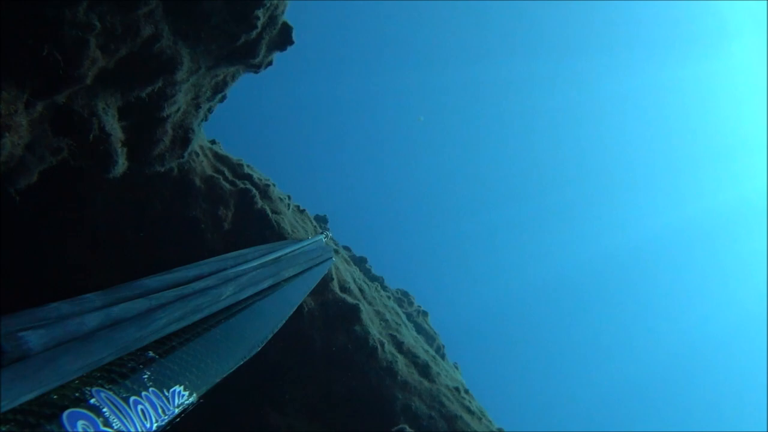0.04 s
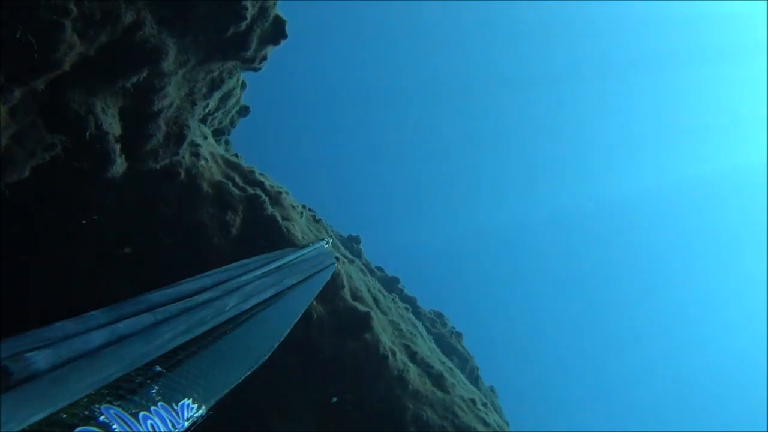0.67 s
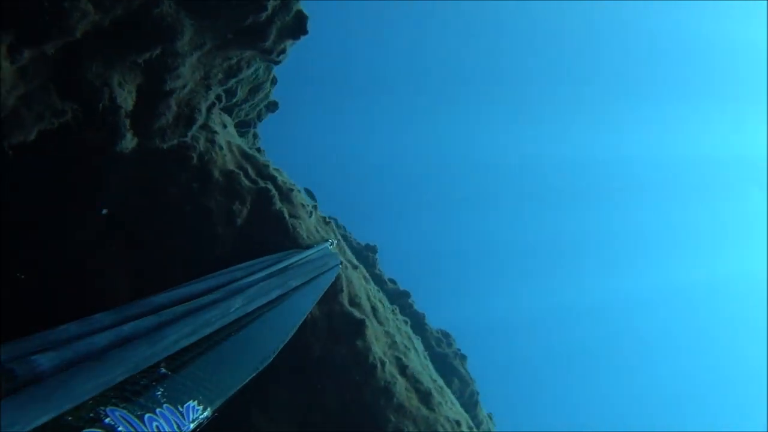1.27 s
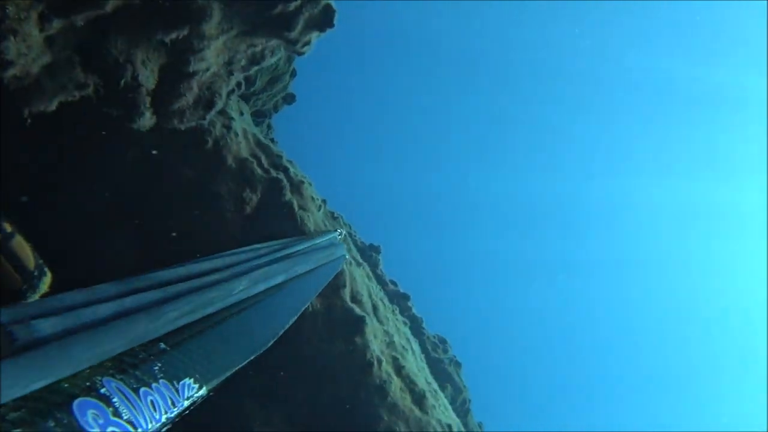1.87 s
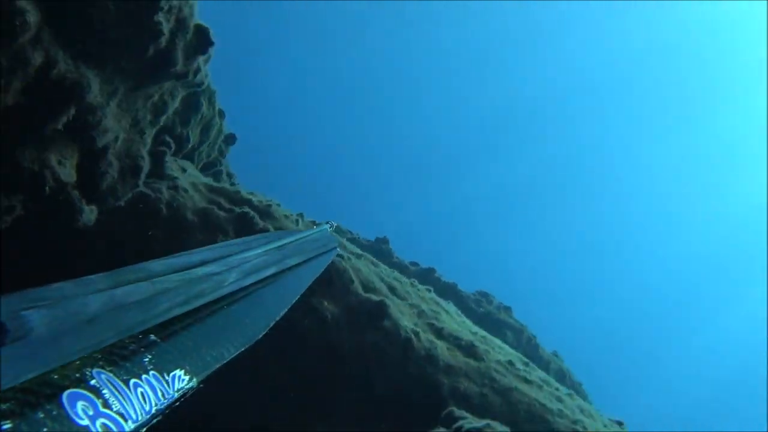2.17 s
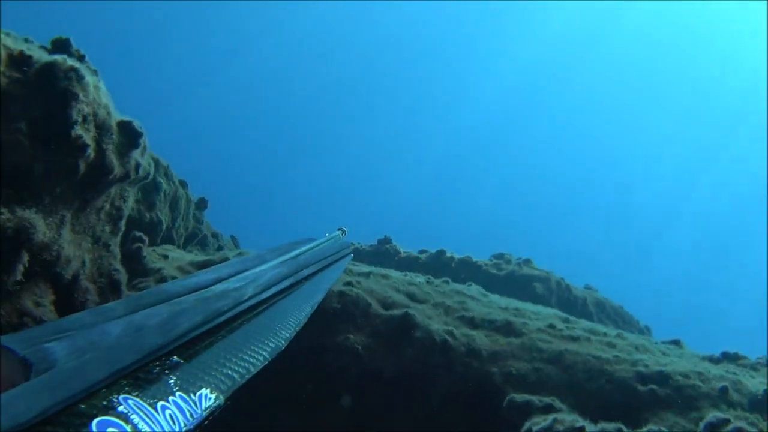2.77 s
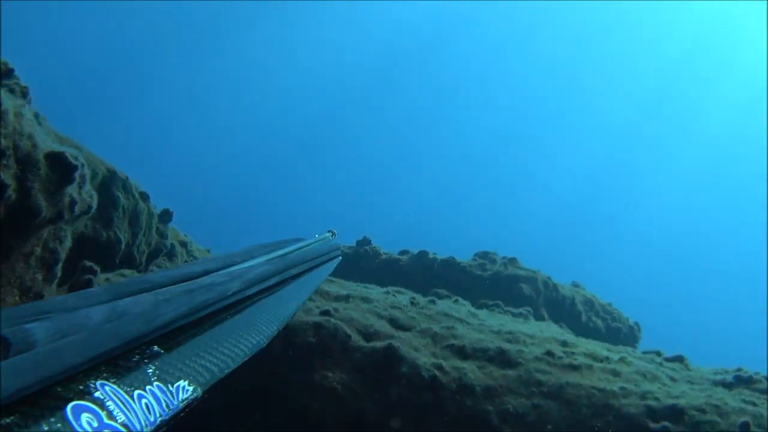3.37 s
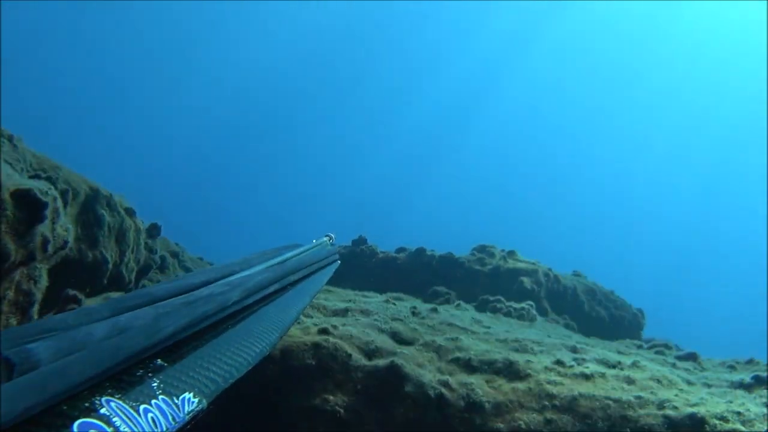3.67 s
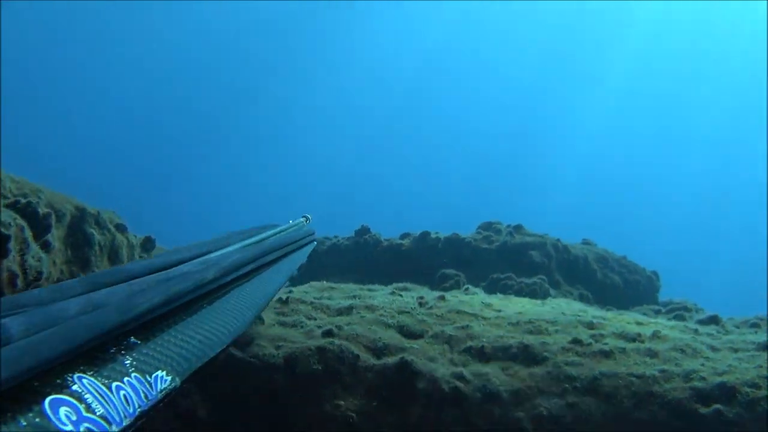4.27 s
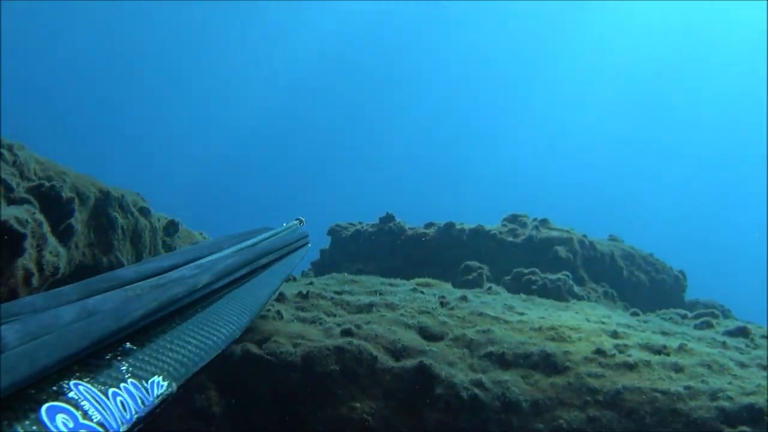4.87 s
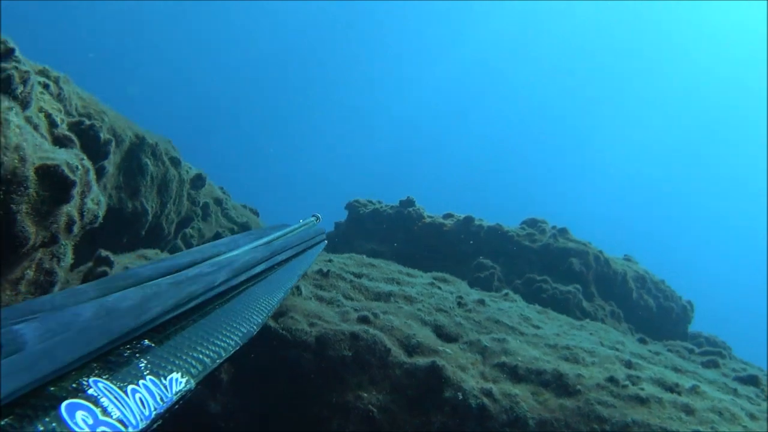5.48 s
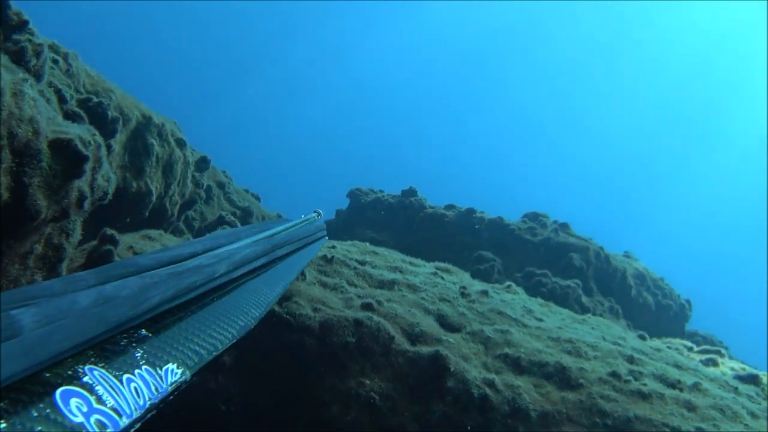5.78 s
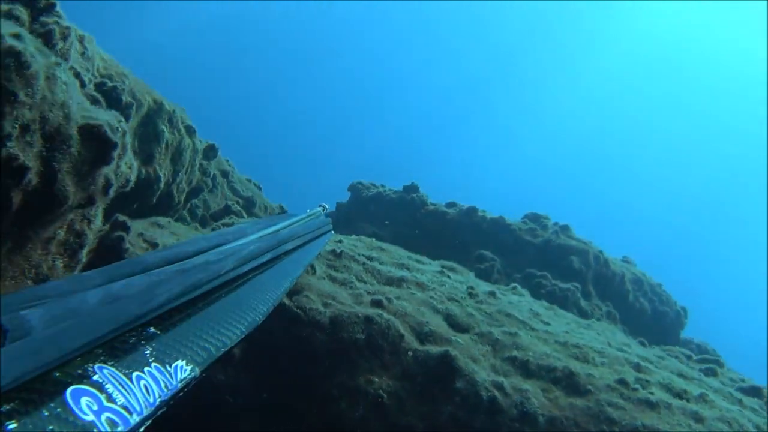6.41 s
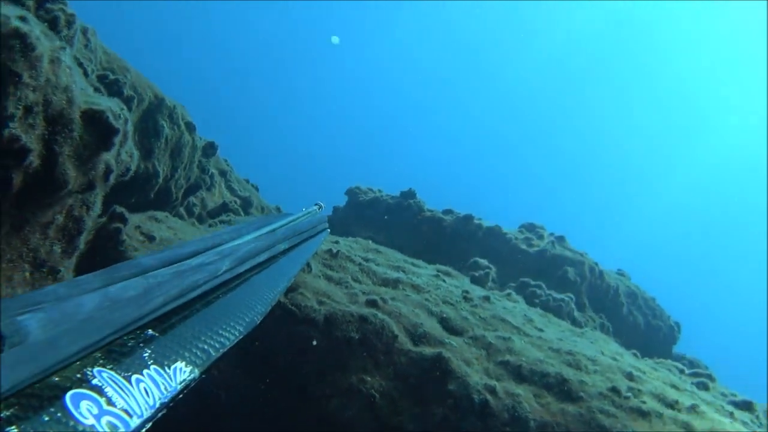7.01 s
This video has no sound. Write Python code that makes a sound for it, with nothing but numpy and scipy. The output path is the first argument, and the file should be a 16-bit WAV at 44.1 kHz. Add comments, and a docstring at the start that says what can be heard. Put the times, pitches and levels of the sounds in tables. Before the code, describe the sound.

A microphone mounted on a speargun picks up close handling noise under water: light taps, dull scuffs and low bumps. Just past the middle come two loud, hollow clacks in quick succession, each with a short ring and a low hum from the shaft. Deep thuds and muffled knocks continue afterwards. Throughout, the reef gives a faint hiss and the scattered sharp clicks of snapping shrimp.

```python
"""Under water on a rocky reef, heard by a camera fixed to a diver's speargun.
From the start, snapping shrimp click all around over a faint hiss coloured by the camera's housing.
For four seconds the gun is lightly tapped, rubbed and bumped, and sways on its mount with low thuds.
At 4.15 and 4.53 s it clacks loudly against something hard, ringing the housing and the long shaft.
More thuds, rubs and softer knocks follow to the end."""
import sys
import numpy as np
from scipy import signal
from scipy.fft import rfft, irfft
from scipy.io import wavfile

SR = 44100
rng = np.random.default_rng(int(sys.argv[2]) if len(sys.argv) > 2 else 0)


def generate_wav(signal):
    """Clip the signal to [-1, 1] and save it as 16-bit WAV at the path in sys.argv[1]."""
    frames = np.transpose(np.atleast_2d(signal))
    scaled = np.clip(frames, -1, 1) * 32767
    pcm = np.round(scaled).astype(np.int16)
    wavfile.write(sys.argv[1], SR, pcm)


N = 319725

# Shoves of the gun. Each row: start in seconds, sway in dB, shaft hum in dB, change per rebound in dB.
SHOVES = [(0.287, -37, -70, -2.5), (1.639, -36.5, -53, -19.5), (1.864, -27, -70, -4.5),
          (2.203, -26.5, -57, -0.5), (3.293, -39.5, -66, -15), (4.148, -18, -38.5, -8),
          (4.529, -15, -32, -7), (5.056, -36.5, -50.5, -1), (5.755, -15, -55, -5), (6.084, -17, -40.5, -8),
          (6.931, -32.5, -70, -10), (7.193, -16.5, -42.5, -12)]
HISS_TOP_HZ, SNAP_TOP_HZ, BAND_TOP_HZ = 11200, 11500, 16500


def amp(db):
    """Decibels to gain."""
    return 10 ** (np.asarray(db) / 20)


def unit_rms(x):
    """Scales to rms 1."""
    return x / np.sqrt(np.mean(x ** 2) + 1e-20)


def curve_at(points, hz):
    """Interpolates a table on a log-frequency axis."""
    points_hz, values = np.transpose(points)
    return np.interp(np.log(hz + 1), np.log(points_hz + 1), values)


def add(mix, start_s, sound, pan_db=0):
    """Mixes a sound in; pan_db is left over right."""
    part = mix[:, max(round(start_s * SR), 0):][:, :sound.shape[-1]]
    part += (sound * amp([[pan_db / 2], [-pan_db / 2]]))[:, :part.shape[1]]


def lowpass(x, hz, order=2):
    """Causal low-pass."""
    return signal.sosfilt(signal.butter(order, min(hz, SR / 2 - 100), fs=SR, output="sos"), x)


def port_sine(hz, t, lead_rad):
    """A sine at the two microphone ports, the left leading."""
    return np.sin(2 * np.pi * hz * t + np.array([[.5], [-.5]]) * lead_rad)


def port_noise(colour, size, top_hz=BAND_TOP_HZ):
    """Noise partly shared by the two ports. Each colour row: frequency in Hz, relative level in dB."""
    # Each row: frequency in Hz, correlation of the ports (negative: they move against each other).
    port_correlation = [(50, 0.93), (150, 0.23), (300, -0.45), (800, -0.77), (1300, -0.59), (2000, -0.52),
                        (4000, -0.25), (6500, 0.14), (10000, 0.29)]
    hz = np.fft.rfftfreq(size, 1 / SR)
    left, independent = rfft(rng.standard_normal((2, size)))
    shared = np.clip(curve_at(port_correlation, hz), -1, 1)
    right = shared * left + np.sqrt(1 - shared ** 2) * independent
    spectra = np.array([left, right]) * amp(curve_at(colour, hz)) * (hz < top_hz)
    return unit_rms(irfft(spectra, size))


def water(hiss_db=-53.0, rumble_db=-2):
    """Steady hiss, and the rumble of water moving round the gun."""
    # Each row: frequency in Hz, relative density in dB.
    hiss_colour = [(20, 14.5), (52, 8), (100, -6), (250, -4), (600, -5.5), (950, -6), (1290, 1),
                   (1700, -7.5), (2500, -13), (4500, -21.5), (6500, -21.5), (9000, -26), (11000, -27)]
    # Each row: time in seconds, level in dB before rumble_db.
    rumble_levels = [(0.0, -77), (0.4, -61.5), (1.79, -56.5), (2.17, -41.5), (3.05, -59.5), (3.44, -47),
                     (3.9, -54), (4.76, -47), (5.02, -57), (5.95, -40.5), (7.15, -53.5)]
    level_db = np.interp(np.arange(N) / SR, *np.transpose(rumble_levels))
    rumble_colour = [(10, -6.5), (22, 1.5), (31, 0.5), (44, -8), (60, -4), (80, -20), (110, -37),
                     (800, -86)]
    rumble = amp(level_db + rumble_db) * port_noise(rumble_colour, N)
    return amp(hiss_db) * port_noise(hiss_colour, N, HISS_TOP_HZ) + rumble


def snap(pop_db, tick_t60_s=0.0099, pop_t60_s=0.021, size=768):
    """A shrimp's bubble collapses: a bright tick, and a lower pop that the housing holds longer."""
    # Each row of both: frequency in Hz, relative level in dB.
    tick_colour = [(2000, -51), (4200, -7), (5300, -6), (6400, -0.5), (7600, 1), (8700, -22.5), (10800, -7),
                   (12000, -111)]
    pop_colour = [(600, -20), (1500, -32), (2200, -18), (3170, 6), (4000, -15), (5000, -12), (8000, -40)]
    t = np.arange(size) / SR
    tick = port_noise(tick_colour, size) * amp(-60 * t / tick_t60_s)
    pop = port_noise(pop_colour, size) * amp(pop_db - 60 * t / pop_t60_s)
    click = lowpass(tick + pop, SNAP_TOP_HZ, order=10)
    return click / np.linalg.norm(click)


def shrimp(near_db=16, near_pop_db=9, pan_db=-2, far_db=-49, far_per_s=50, spread_db=6.0,
           ceiling_db=15, animals=24):
    """A few near snaps stand out of the crackle of the whole reef."""
    # Each row: start in seconds, level in dB before near_db, pop over tick in dB before near_pop_db.
    near_snaps = [(0.3292, -42, -27), (0.355, -43.5, -16), (0.952, -46, -15), (1.4446, -47, -24),
                  (1.6212, -41, -32), (1.9016, -46, -26), (2.155, -41, -23), (2.5263, -46.5, -27),
                  (2.6957, -43, -7), (2.8477, -43, -17), (3.037, -42, -16.5), (3.8139, -43.5, -28),
                  (4.0677, -42.5, -9), (4.6423, -43, -16), (5.1672, -45.5, -15), (6.129, -42, -8.5),
                  (6.2256, -46, -26), (7.1048, -48.5, -19)]
    out = np.zeros((2, N))
    for start_s, db, pop_db in near_snaps:
        add(out, start_s, amp(db + near_db) * snap(pop_db + near_pop_db), pan_db)
    excess_db = np.minimum(spread_db * rng.exponential(1, N), ceiling_db)
    impulses = amp(far_db + excess_db) * (rng.random(N) < far_per_s / SR)
    animal = rng.integers(0, animals, N)
    for k, pop_db in enumerate(np.linspace(-26, 2, animals)):
        out += signal.oaconvolve((impulses * (animal == k))[None], snap(pop_db), axes=1)[:, :N]
    return out


def shaft_hum(build_s=0.0092):
    """The long shaft's bending after one shove."""
    # Each row: frequency in Hz, level in dB, t60 in seconds, left port's lead in radians.
    bending_modes = [(81.2, -1.5, 0.23, 0.26), (148, 2, 0.051, 0.78), (191, -5.5, 0.14, 5.4),
                     (245.4, 0.5, 0.34, 0.94), (327, -25, 0.086, 1.6), (484, 0, 0.075, 0.33)]
    t = np.arange(SR * 3 // 4) / SR
    hum = sum(amp(db - 60 * t / t60_s) * port_sine(hz, t, lead_rad)
              for hz, db, t60_s, lead_rad in bending_modes)
    return hum * (1 - np.exp(-t / build_s))


def housing_ring(build_cycles=1.07):
    """Gun and housing after one blow: each mode swells within a cycle or two, then dies."""
    # Each row: frequency in Hz, level in dB, t60 in seconds, left port's lead in radians.
    housing_modes = [(506, -38, 0.11, 2.5), (619, -30, 0.12, 3.5), (707, -24, 0.048, 3.5),
                     (798, -17.5, 0.014, 4), (968, -16, 0.032, 1.8), (1100, -6.5, 0.027, 1.07),
                     (1218, -9, 0.013, -0.1), (1411, -15, 0.021, -1.66), (1732, -18.5, 0.043, -3),
                     (1955, -21, 0.034, 1.9), (2440, -19.5, 0.015, 1.44), (2585, -18.5, 0.018, -2),
                     (2870, -16.5, 0.016, -2.5), (3276, -11.5, 0.0096, 2), (4410, -22.5, 0.02, 2.2),
                     (4880, -22, 0.0069, 0.3), (5820, -17, 0.01, 2.4), (6380, -13, 0.0076, 1.46)]
    t, ring = np.arange(SR // 6) / SR, 0
    for k, (hz, db, t60_s, lead_rad) in enumerate(housing_modes):
        swell = 1 - np.exp(-t * hz / build_cycles)
        ring += (-1) ** k * amp(db - 60 * t / t60_s) * swell * port_sine(hz, t, lead_rad)
    return ring


def grip_force(t, slip_rise_s=0.0088, slip_fall_s=0.017, rise_per_fall=1.1, rub_shudder_db=-5):
    """Strength of scrape, scuff and shudder: the grip slips at each shove and as the hand shifts."""
    # Force against a shove's sway, in dB: scrape, scuff, shudder.
    slip_db = (-34.5, -25.5, -21.5)
    # Each row: peak time in seconds, fall in seconds, scuff force in dB, scrape force over it in dB.
    hand_shifts = [(0.265, 0.0094, -46, -12), (0.9, 0.0059, -50, -10), (1.645, 0.051, -61, -5.5),
                   (1.853, 0.033, -51.5, 1), (2.039, 0.016, -51.5, 2.5), (2.245, 0.026, -46.5, -19),
                   (2.36, 0.087, -57.5, -9.5), (3.22, 0.15, -59, -5.5), (3.29, 0.012, -57, 11.5),
                   (5.12, 0.11, -66, 2.5), (6.065, .02, -63, 5), (6.305, 0.048, -49.5, -7),
                   (6.61, 0.093, -55.5, -13), (6.679, 0.012, -46.5, -13), (6.8, .035, -54.5, -10.5),
                   (7.059, 0.021, -56, -1)]

    def swell(peak_s, rise_s, fall_s):
        return np.exp(-np.maximum((peak_s - t) / rise_s, (t - peak_s) / fall_s))
    shoves = sum(amp(db) * swell(start_s, slip_rise_s, slip_fall_s) for start_s, db, *_ in SHOVES)
    force = amp(slip_db)[:, None] * shoves
    for peak_s, fall_s, db, hard_db in hand_shifts:
        gains = amp([[db + hard_db], [db], [db + rub_shudder_db]])
        force += gains * swell(peak_s, rise_per_fall * fall_s, fall_s)
    return force


def rubs(ring, hum, slips_per_s=900, soft_hz=1250, grip_t60_s=0.049, palm_hz=260,
         scrape_db=-1, scuff_db=-1, shudder_db=-2):
    """Tiny slips ring the housing and shake the palm-damped shaft; the soft grip adds a dull scuff."""
    t = np.arange(N) / SR
    scrape_force, scuff_force, shudder_force = grip_force(t)
    slips = unit_rms(rng.standard_normal(N) * (rng.random(N) < slips_per_s / SR))

    def excite(body, force):
        return signal.oaconvolve((slips * force)[None], body / np.linalg.norm(body[0]), axes=1)[:, :N]
    held_shaft = lowpass(hum * amp(-60 * t[:hum.shape[1]] / grip_t60_s), palm_hz)
    scrape = excite(lowpass(ring, soft_hz), scrape_force)
    shudder = excite(held_shaft, shudder_force)
    scuff_colour = [(100, -35), (240, -4), (340, -7.5), (480, 2), (600, -6.5), (800, -8.5),
                    (1500, -20), (4000, -33), (9000, -48)]
    scuff = port_noise(scuff_colour, N, HISS_TOP_HZ) * scuff_force
    return amp(scrape_db) * scrape + amp(scuff_db) * scuff + amp(shudder_db) * shudder


def bumps(hum, sway_hz=52.9, sway_t60_s=0.22, build_s=0.011, lead_rad=0.81, pan_db=-3,
          rebound_hz=45.6, rebound_gap_s=0.059, rebound_pan_db=-6, rebounds=2):
    """A shove sways the gun in the water; it rebounds more slowly in the hand, and its shaft hums on."""
    out, t = np.zeros((2, N)), np.arange(hum.shape[1]) / SR
    envelope = amp(-60 * t / sway_t60_s) * (1 - np.exp(-t / build_s))
    sway = envelope * port_sine(sway_hz, t, lead_rad)
    rebound = envelope * port_sine(rebound_hz, t, lead_rad)
    for start_s, db, hum_db, step_db in SHOVES:
        add(out, start_s, amp(db) * sway + amp(hum_db) * hum, pan_db)
        for k in range(1, rebounds + 1):
            add(out, start_s + k * rebound_gap_s, amp(db + k * step_db) * rebound, rebound_pan_db)
    return out


def along_shaft(x, travel_1khz_s=0.001897, advance_s=0.00034):
    """Bending waves gain speed as the root of frequency, so the treble arrives first."""
    size = x.shape[1]
    hz = np.fft.rfftfreq(2 * size, 1 / SR)
    lag_cycles = 2 * travel_1khz_s * np.sqrt(1000 * hz) - advance_s * hz
    return irfft(rfft(x, 2 * size) * np.exp(-2j * np.pi * lag_cycles))[:, :size]


def knocks(ring, crack_db=-17, crack_t60_s=0.013, boom_db=-24, boom_t60_s=0.07,
           echo_s=0.0082, echo_db=-17, echo_hz=1500):
    """A hard contact cracks, booms hollowly and rings the housing; the rock returns a dull echo."""
    # Each row: start in seconds, level in dB, low-pass cutoff in Hz, left over right in dB.
    contacts = [(0.2678, -33, 5940, 14.5), (0.894, -38.5, 3500, 9), (2.0263, -33, 1100, 0),
                (3.281, -36, 1800, 6), (4.15, -21.5, 15000, -7), (4.1533, -0.5, 15000, 2.5),
                (4.5294, 1.5, 8200, 0), (5.748, -28, 1100, -11), (6.0841, -31, 796, 2),
                (6.674, -24.5, 750, 4), (7.192, -22, 1130, 3.5)]
    crack_colour = [(900, -24), (2000, 9), (3200, 1.5), (4100, 0), (5200, 5.5), (6700, 2),
                    (9000, -10), (11000, -4.5), (12200, -36), (16000, -40.5)]
    boom_colour = [(150, -10), (450, -5), (900, 2), (1800, -12), (3500, -22), (8000, -55)]
    out, t = np.zeros((2, N)), np.arange(ring.shape[1]) / SR
    for start_s, db, cutoff_hz, pan_db in contacts:
        crack = port_noise(crack_colour, len(t)) * amp(crack_db - 60 * t / crack_t60_s)
        boom = port_noise(boom_colour, len(t)) * amp(boom_db - 60 * t / boom_t60_s)
        clack = amp(db) * along_shaft(lowpass(ring + crack + boom, cutoff_hz))
        add(out, start_s, clack, pan_db)
        add(out, start_s + echo_s, amp(echo_db) * lowpass(clack, echo_hz), pan_db)
    return out


def scene():
    """Handling sounds of the gun over the reef's background."""
    ring, hum = housing_ring(), shaft_hum()
    return water() + shrimp() + knocks(ring) + rubs(ring, hum) + bumps(hum)


def record(dry):
    """The camera's band limit."""
    taps = signal.firwin(511, BAND_TOP_HZ, window=("kaiser", 9), fs=SR)
    return signal.oaconvolve(dry, taps[None], "same")


dry = scene()
out = record(dry)
generate_wav(out)
```